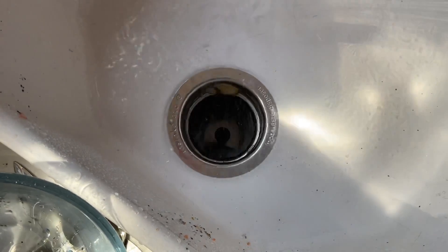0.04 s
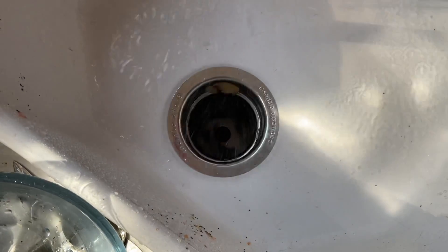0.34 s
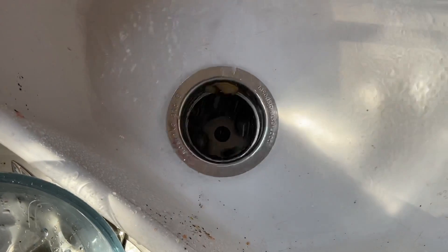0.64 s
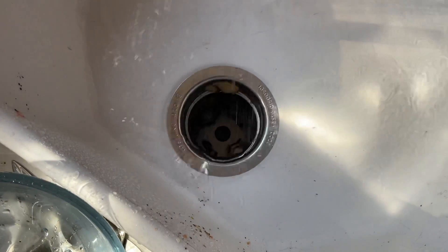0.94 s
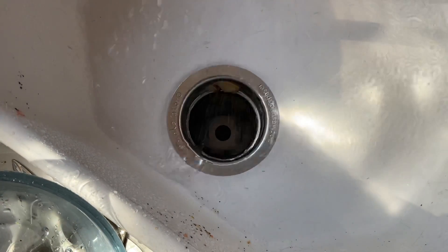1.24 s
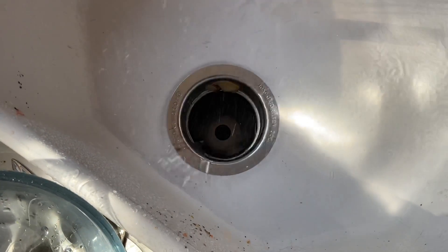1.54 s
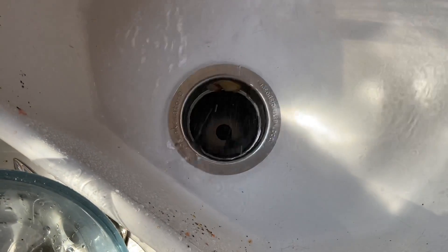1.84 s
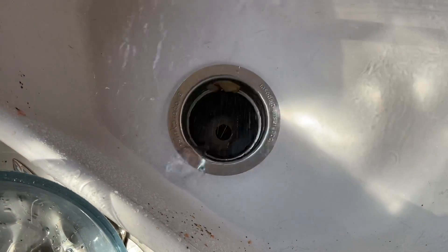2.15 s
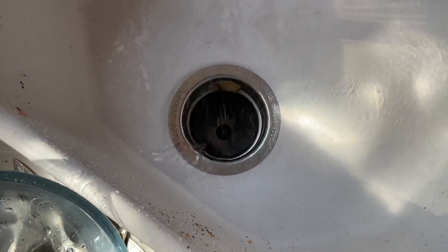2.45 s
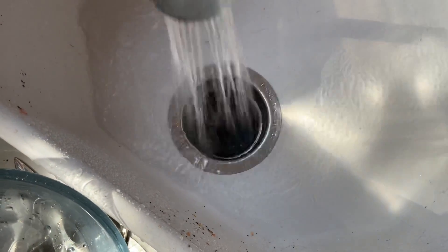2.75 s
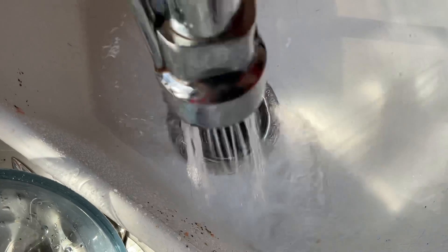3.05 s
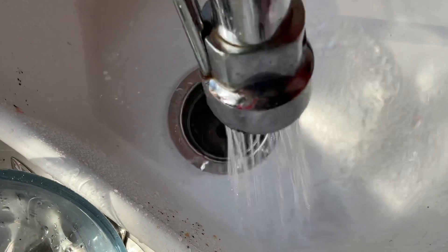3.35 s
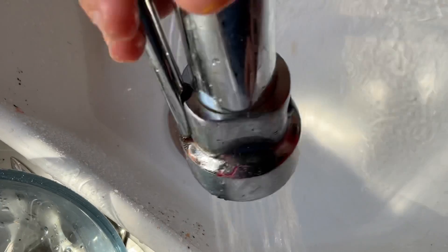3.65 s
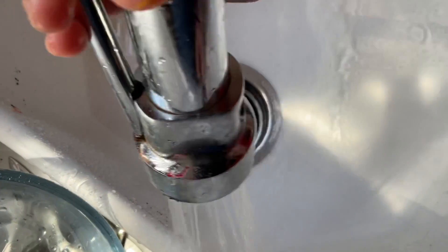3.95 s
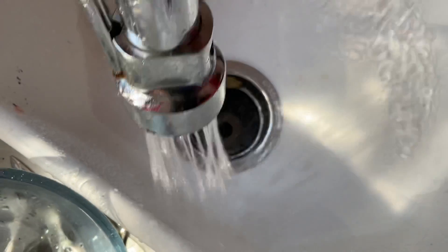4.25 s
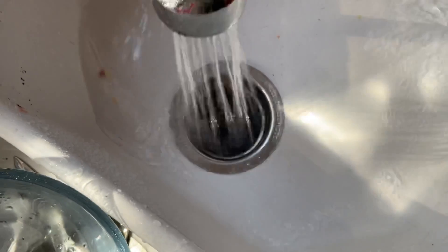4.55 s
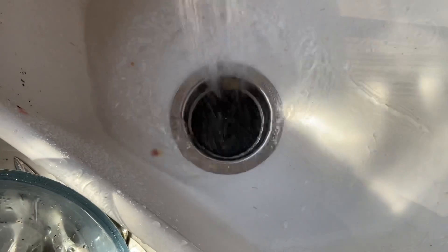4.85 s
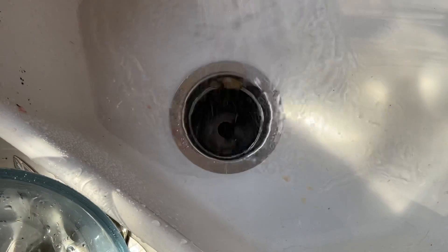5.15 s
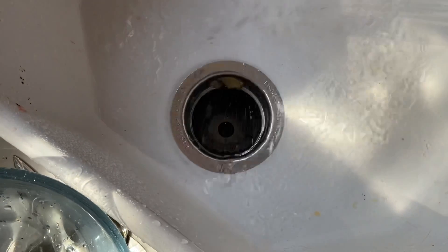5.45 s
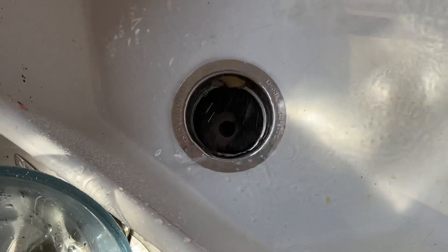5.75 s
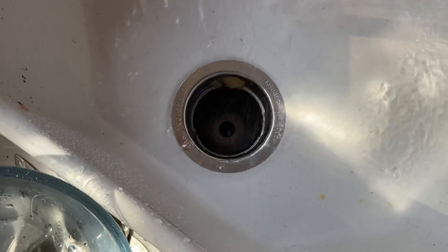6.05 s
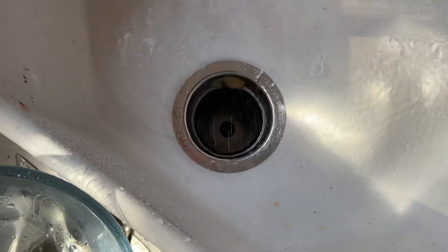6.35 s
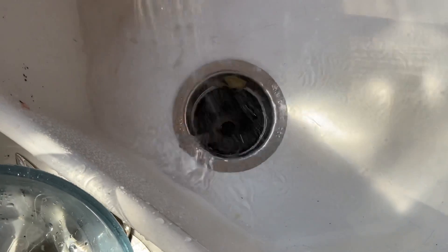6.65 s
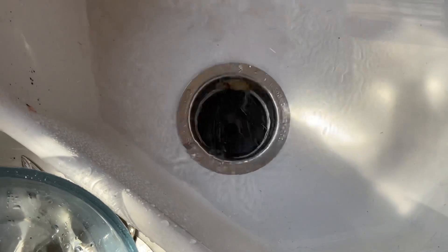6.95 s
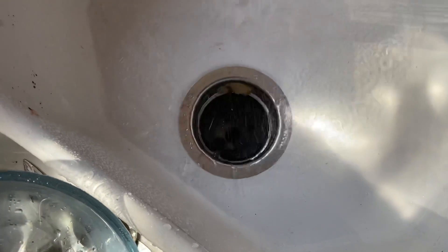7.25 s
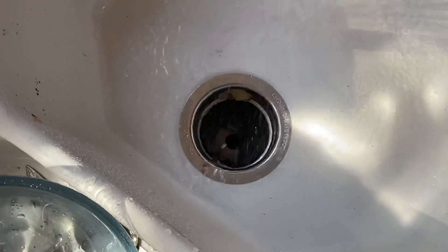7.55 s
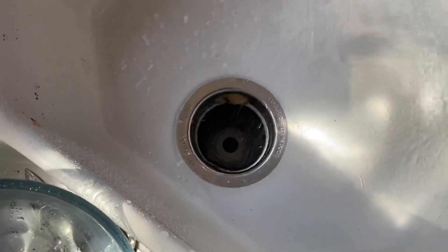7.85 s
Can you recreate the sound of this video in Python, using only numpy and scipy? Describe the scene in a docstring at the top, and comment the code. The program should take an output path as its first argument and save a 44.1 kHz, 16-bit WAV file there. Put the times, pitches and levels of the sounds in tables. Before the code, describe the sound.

Close over a kitchen sink, a waste disposal unit slows, then restarts with a brief scrape and a thud. It keeps humming and churning under the steady hiss of a spray tap, with spitting drops and hollow gurgles from the drain. The churning eases midway as the spray moves over the opening, then returns, growing heavier and louder toward the end as the water is ground away.

```python
"""A waste disposal unit churns and grinds under a kitchen sink while a spray tap runs into the basin.
Its motor coasts down, is switched on again with a jolt and hums; the spinning plate throws water against
the ringing chamber and flings drops at the metal collar. Air glugs and rings in the drain opening, whose
note drops as the spray is swept over it. Then the pooled water goes down and is ground loudly."""
import sys
import numpy as np
from scipy import signal
from scipy.fft import rfft, irfft
from scipy.io import wavfile

SR = 44100
rng = np.random.default_rng(int(sys.argv[2]) if len(sys.argv) > 2 else 0)


def transcribe(signal):
    """Save signal, clipped to [-1, 1], as a 16-bit WAV file at the path in sys.argv[1]."""
    frames = np.atleast_2d(signal).T
    limited = np.clip(frames, -1, 1)
    pcm = np.round(limited * 32767).astype(np.int16)
    wavfile.write(sys.argv[1], SR, pcm)


N = 352800
TIME = np.arange(N) / SR
BIN_HZ = np.arange(N // 2 + 1) * SR / N
DIRECT_ONLY = np.array([[1], [0]])   # water sounds travel as a pair: direct, scattered
FULL_TURNS_PER_S = 24.47
SCRAPE_S, SWITCH_ON_S, JOLT_S = 1.182, 1.203, 1.228


def from_db(db):
    """Decibels to gain."""
    return np.exp(np.asarray(db) * (np.log(10) / 20))


def unit_rms(x):
    """Scale to unit power."""
    return x / np.sqrt(np.mean(x ** 2) + 1e-20)


def automation(rows):
    """One curve over time for each column after the first, which holds seconds."""
    seconds, *columns = np.transpose(rows)
    return [np.interp(TIME, seconds, column) for column in columns]


def on_bins(points):
    """A curve over log frequency, read at every Fourier bin."""
    hz, value = np.transpose(points)
    return np.interp(np.log1p(BIN_HZ), np.log1p(hz), value)


def coloured(x, eq):
    """Shape x with a smooth EQ curve; unit power."""
    return unit_rms(irfft(rfft(x) * from_db(on_bins(eq)), N))


def drift(per_s):
    """A random wander of unit power that changes course about per_s times a second."""
    knots = rng.standard_normal(1000)
    return unit_rms(np.interp(TIME * per_s, np.arange(len(knots)), knots))


def swell(peak_s, rise_s, fall_s):
    """A rounded rise to 1 and fall back."""
    t = TIME - peak_s
    return np.exp(-np.minimum((t / np.where(t < 0, rise_s, fall_s)) ** 2 / 2, 20))


def strikes(events):
    """One click for each event, at its time and level."""
    clicks = np.zeros(N)
    for start_s, db in events:
        clicks[round(start_s * SR)] += from_db(db)
    return clicks


def fading(clicks, decay_s):
    """An envelope that jumps at each click and dies away."""
    return signal.lfilter([1], [1, -np.exp(-1 / (decay_s * SR))], clicks + 1e-18)


def resonate(x, hz, width_hz):
    """A steep-sided resonance whose pitch may glide; unit power."""
    carrier = np.exp(2j * np.pi * np.cumsum(np.broadcast_to(hz, N)) / SR)
    pole = np.exp(-np.pi * width_hz / SR)
    envelope = signal.lfilter([(1 - pole) ** 2], [1, -2 * pole, pole ** 2], x / carrier + 1e-18)
    return unit_rms(np.real(carrier * envelope))


def ring(x, modes):
    """Drive a bank of steep-sided modes, which add in power; unit power."""
    power = sum(from_db(db) ** 2 / (1 + (2 * (BIN_HZ - hz) / width) ** 2) ** 2 for hz, width, db in modes)
    return unit_rms(irfft(rfft(x) * np.sqrt(power), N))


def splashes(per_s, spread_db, wash_db):
    """Random impacts over a smooth wash, direct and scattered; spread_db makes the rare ones bigger."""
    chance = rng.random((2, N)) * (SR / per_s)
    lands, impacts = chance < 1, np.zeros((2, N))
    sizes = from_db(spread_db * np.minimum(-np.log(chance[lands]), 4))
    impacts[lands] = sizes * np.sign(rng.random((2, N))[lands] - .5)
    return unit_rms(unit_rms(impacts) + from_db(wash_db) * rng.standard_normal((2, N)))


def churned(water, turns, beat, scrape_db, surge_db, surges_per_s):
    """Two unequal lugs beat the water each turn, and the plate scrapes past the same spots."""
    spots = rng.standard_normal((2, 1800))
    scraping = from_db(scrape_db) * spots[:, (turns % 1 * spots.shape[1]).astype(int)]
    lugs = sum(share * np.cos(2 * np.pi * (order * turns + rng.random()))
               for order, share in ((1, .8), (2, 1), (3, .6), (4, .6), (9, .6)))
    return (water + scraping) * np.exp(beat * lugs) * from_db(surge_db * drift(surges_per_s))


# The microphone's stereo width. Each row: frequency in Hz, correlation of left and right.
STEREO_LIKENESS = [(100, .999), (150, .995), (300, .96), (600, .9), (1100, .88), (1800, .68), (2200, .93),
                   (2650, .99), (3400, .87), (4600, .99), (5600, .85), (7200, .76), (7900, .995),
                   (11000, .98), (16000, .85)]
# Phase between its two sides. Each row: frequency in Hz, lead of the left side in radians.
STEREO_LEAD = [(0, 0), (150, 0), (300, -.2), (860, .7), (1290, .5), (1550, -1.2), (1810, -1.4),
               (2200, -2.3), (2650, -3.14), (3000, -3.8), (3500, -5.2), (4300, -6.2), (5100, -6.28),
               (6100, -6.1), (7300, -5.2), (7750, -6.28), (12000, -6.3), (16000, -6.5)]
# Balance between its two sides. Each row: frequency in Hz, left over right in dB.
STEREO_BALANCE = [(100, 0), (200, -.5), (380, -3.5), (700, 8), (1290, 4), (2380, 1), (4400, -.4), (8000, 0),
                  (15000, 0)]
def stereo_image(pair):
    """The microphone's two sides pick up the water with frequency-dependent phase, level and likeness."""
    direct, scattered = rfft(pair)
    alike, sides = on_bins(STEREO_LIKENESS), np.array([[1], [-1]])
    both = np.sqrt((1 + alike) / 2) * direct + sides * np.sqrt((1 - alike) / 2) * scattered
    phase = np.exp(sides * .5j * on_bins(STEREO_LEAD))
    balance = from_db(sides * on_bins(STEREO_BALANCE) / 2)
    return irfft(both * phase * balance, N)


# Early reflections off the basin walls. Each row: delay in seconds, level in dB.
WALL_ECHOES = [(.0017, -20), (.0029, -26), (.0047, -13.5), (.0083, -16), (0.0132, -20.5)]
def basin(x, ripple=0.025, ripples_per_s=2.5):
    """Close echoes comb the hiss and make it hollow; the rippling water keeps shifting their paths."""
    out = x
    for delay_s, db in WALL_ECHOES:
        lag = delay_s * SR * (1 + ripple * drift(ripples_per_s))
        heard = np.round(np.arange(N) - lag).astype(int)
        out = out + from_db(db) * x[:, np.clip(heard, 0, N - 1)]
    return out


# The tap's fader, dipping as the spray is swept across the basin. Each row: time in seconds, level in dB.
TAP_LEVEL = [(0, -29.5), (.55, -31.5), (1.16, -31.5), (1.33, -27.5), (2.4, -27.5), (2.8, -31), (3.3, -28.5),
             (4.12, -34), (4.7, -30.5), (5.4, -28), (6.6, -27), (7.15, -25), (8, -28)]
# The bright hiss of water on the basin. Each row: frequency in Hz, relative level in dB.
TAP_EQ = [(40, -7), (80, 1), (170, -7), (330, -19), (520, -29), (650, -16), (830, -14), (1100, -14),
          (1300, -16), (1560, -14), (2500, -17), (4000, -9), (5300, -6.5), (6200, 0), (7500, -3),
          (10000, 2.5), (13000, 0), (16000, -1)]
def tap(splats_per_s=70, splat_s=0.0033):
    """Fine jets patter on the wet basin; now and then a fatter drop bursts into mist."""
    lands = rng.random(N) < splats_per_s / SR
    splats = lands * from_db(1.7 * np.clip(rng.standard_normal(N), -2, 2))
    patter = splashes(per_s=6800, spread_db=3.2, wash_db=3.5)
    patter *= from_db(0.64 * drift(12) + 0.56 * drift(45))
    patter *= np.hypot(1, fading(splats, splat_s))
    return from_db(automation(TAP_LEVEL)[0]) * basin(coloured(patter, TAP_EQ))


def spray_head_notch(x, hz=765, half_width_hz=75, depth_db=-14, centre_s=4.28, half_s=0.11):
    """The spray head passing over the drain hollows out the band between the opening's two air modes."""
    band = irfft(rfft(x) / (1 + ((BIN_HZ - hz) / half_width_hz) ** 6), N)
    return x - band * (1 - from_db(depth_db * swell(centre_s, half_s, half_s)))


# Glugs, high in the drain opening and low in the chamber.
# Each row: centre in seconds, half length in seconds, pitch in Hz, level in dB.
GLUGS = [(0.024, .02, 667, -28), (0.093, 0.048, 331, -31), (0.2, 0.02, 312, -32), (0.312, .016, 252.6, -28),
         (0.335, 0.042, 574, -39), (0.394, .015, 308, -29), (0.476, 0.041, 321, -40),
         (.6, .046, 301, -45.5), (.78, .022, 244.6, -48), (.853, 0.091, 422, -47), (.92, 0.02, 250, -48),
         (1.144, 0.0079, 334, -41), (1.385, .04, 653, -36), (2.255, .016, 645, -36),
         (2.368, 0.013, 655, -33.5), (2.474, 0.038, 436.7, -34.5), (2.688, 0.038, 440, -35),
         (2.795, .03, 285, -30.5), (2.8, 0.035, 449, -30), (2.896, 0.018, 263, -28),
         (2.944, 0.015, 281, -33), (3.05, 0.018, 441, -36), (3.725, .03, 301, -29), (3.763, .014, 880, -35),
         (3.866, .02, 294, -30), (3.94, 0.017, 668, -37), (4.06, .012, 886, -37), (4.135, 0.027, 660, -35),
         (4.575, .015, 468, -35), (4.59, 0.012, 302.6, -25), (4.632, 0.012, 304, -26),
         (4.655, .014, 440, -33), (4.71, .014, 433.4, -32), (4.742, 0.018, 322.3, -30),
         (4.886, .016, 297, -29), (5.008, 0.0099, 344, -29), (5.055, .016, 656, -37),
         (5.13, 0.013, 270.4, -29), (5.15, .02, 663, -33.5), (5.262, .015, 648, -29),
         (5.53, .016, 227.5, -30), (5.612, .016, 259.5, -28), (5.83, .016, 650, -32),
         (5.9, 0.018, 666, -32), (6.023, .014, 663, -35), (6.063, 0.039, 331, -29),
         (6.23, 0.017, 661, -28.5), (6.397, .018, 674, -29), (6.681, 0.014, 273, -29),
         (7.03, .025, 1170, -30), (7.15, .035, 440, -30.5), (7.06, .02, 245, -26), (7.17, .025, 240.3, -26),
         (7.27, .02, 250, -24), (7.33, .016, 265, -26), (7.392, 0.014, 291, -24), (7.458, .02, 250, -26)]
def gurgle(wobble=0.01306, flutter_db=1.5, roughness=0.56):
    """Each pocket of trapped air holds its own note, roughened by the water around it."""
    clock = np.cumsum(1 + wobble * drift(70)) / SR
    notes = sum(from_db(db) * swell(centre_s, half_s, half_s) * np.sin(2 * np.pi * hz * clock)
                for centre_s, half_s, hz, db in GLUGS)
    flutter = from_db(flutter_db * drift(60)) * (1 + roughness * drift(110))
    return np.sqrt(2) * notes * unit_rms(flutter) * DIRECT_ONLY


# The opening's note, lower as the jets close in on it. Each row: time in seconds, pitch in Hz.
DRAIN_NOTE = [(0, 704), (.3, 608), (1.6, 672), (2.4, 650.1), (4.12, 675.5), (4.3, 606), (4.52, 550),
              (4.85, 550), (5.0, 657.3), (8, 673)]
# The drain sucks air and its note sustains. Each row: start in seconds, end in seconds, level in dB.
SUCKING = [(0, .17, -33.5), (1.327, 1.503, -40), (5.034, 5.3, -36.5), (5.809, 5.952, -37),
           (6.19, 6.52, -38)]
def drain_opening(turns, speed_db, inflow_db, half_covered_db=3.5, suck_fade_s=0.012):
    """Churning, jets and sucked air sound the opening's air modes; under heavy inflow it booms lower."""
    note_hz, = automation(DRAIN_NOTE)
    overtone_hz = np.minimum(1.6 * note_hz, 909)   # tops out with the opening clear
    gulps = splashes(per_s=280, spread_db=5.5, wash_db=-2.5)
    gulps = churned(gulps, turns, beat=0.095, scrape_db=-7, surge_db=-0.5, surges_per_s=22)
    churn = from_db(1.5 * speed_db)
    covered = 1 / (1 + from_db(half_covered_db - inflow_db - speed_db) ** 4)
    jets = from_db(-37.5) * swell(4.25, rise_s=0.41, fall_s=0.24)   # the spray blows across the rim
    sucking = sum(from_db(db) * np.clip(np.minimum(TIME - start, end - TIME) / suck_fade_s, 0, 1)
                  for start, end, db in SUCKING)
    note_level = np.hypot(np.hypot(from_db(-44) * churn * (1 - covered), jets), sucking)
    note = note_level * resonate(gulps, note_hz, width_hz=72)
    overtone = np.hypot(from_db(-45) * churn ** 2, jets) * resonate(gulps, overtone_hz, width_hz=167)
    boom = from_db(-32.5) * churn * covered * resonate(gulps, hz=441, width_hz=47)
    return note + overtone + boom


def bubbles(per_s=260, low_hz=1800, high_hz=9000, decay_cycles=11.3, rise=0.044, range_db=18):
    """Small bubbles ping and rise in pitch as they near the surface; unit power."""
    t = TIME[:SR // 50]
    out = np.zeros(N + len(t))
    for when, pitch, softness in rng.random((int(per_s * N / SR), 3)):
        hz, start = low_hz * (high_hz / low_hz) ** pitch, int(when * N)
        age = hz * t / decay_cycles
        chirp = np.sin(2 * np.pi * hz * t * (1 + rise * np.minimum(age, 5)))
        out[start:start + len(t)] += from_db(-range_db * softness) * np.exp(-age) * chirp
    return unit_rms(out[:N])


# Spits of water on the drain collar. Each row: start in seconds, level in dB.
SPITS = [(0.2952, -14.5), (0.3054, -21), (1.2104, -15), (1.2203, -12), (1.3394, -21), (1.8294, -23),
         (3.9379, -27), (4.3276, -18), (4.8763, -19), (4.9492, -14), (4.9995, -33), (6.785, -13.5)]
# Streams hissing on the collar. Each row: centre in seconds, half length in seconds, level in dB.
STREAMS = [(1.425, .08, -29), (3.084, .08, -29.5), (4.943, 0.029, -43), (6.768, .03, -28)]
def spatter(spray_db, strays_per_s=14, decay_s=0.0022):
    """Water breaks on the collar in spits and streams; stray spits grow stronger when more is flung."""
    lands = rng.random(N) < strays_per_s / SR
    strays = lands * from_db(spray_db + 2 + 5.1 * np.clip(rng.standard_normal(N), -2, 2))
    streams = sum(from_db(db) * swell(centre_s, half_s, half_s) for centre_s, half_s, db in STREAMS)
    envelope = np.hypot(fading(strays + strikes(SPITS), decay_s), streams)
    return envelope * ring(rng.standard_normal((2, N)), [(3970, 870, 5.0), (5700, 3000, -0.5)])


# Hiss of flung drops, also the colour of scrape and rattle.
# Each row: frequency in Hz, relative level in dB.
HISS_EQ = [(40, -30), (80, -21), (170, -20), (500, -3.5), (950, -3), (1850, -2.5), (2700, -25), (4100, -2),
           (6000, -8.5), (8000, 1), (15000, -6.5)]
# The ring of metal collar and basin. Each row: pitch in Hz, width in Hz, relative level in dB.
COLLAR_MODES = [(2190, 240, 6), (2296, 67, 4), (2630, 116, 4.5), (2920, 116, 9), (3160, 184, 10),
                (3384, 650, 3.5), (4030, 820, 2.5), (4540, 250, 0), (5290, 1240, 2.5), (5970, 410, 1.5),
                (6450, 680, -1), (7000, 270, 0.5), (8140, 390, -26.5)]
def flung_spray(turns, speed_db, load_db):
    """Drops thrown off the plate hiss and ring the collar amid a fizz of bubbles."""
    drops = splashes(per_s=3000, spread_db=0, wash_db=2)
    drops = churned(drops, turns, beat=0.051, scrape_db=-9, surge_db=1.15, surges_per_s=40)
    spray_db = -27.5 + 1.89 * speed_db + 0.098 * load_db
    hiss = from_db(-3.5) * coloured(drops, HISS_EQ)
    collar = from_db(-1.5) * ring(drops, COLLAR_MODES)
    fizz = from_db(-5.5) * bubbles() * DIRECT_ONLY
    return basin(from_db(spray_db) * (hiss + collar + fizz) + spatter(spray_db))


# Sharp little accents. Each row: start in seconds, peak level in dB.
TICKS = [(0.2952, -23), (0.3054, -19), (0.408, -14), (1.0335, -10), (1.3784, -16), (2.0318, -17),
         (3.1364, -19), (4.3494, -20)]
def ticks(decay_s=0.0015):
    """Single drops and bits of grit strike with a bright snap."""
    t = TIME[:SR // 10]
    bright_noise = signal.lfilter([1, -2, 1], [1, -.35, .35], rng.standard_normal(len(t)))
    tick = bright_noise * np.exp(-t / decay_s)
    return signal.fftconvolve(strikes(TICKS), tick / np.abs(tick).max())[:N]


# Heavy slugs of water landing. Each row: start in seconds, peak level in dB.
THUMPS = [(0.302, -19), (1.826, -22), (2.748, -27), (3.932, -23), (4.558, -26), (4.59, -24), (4.94, -31),
          (5.004, -18.5), (5.13, -25), (5.523, -19.5), (5.688, -19.5), (6.092, -21), (6.987, -18),
          (7.161, -22), (7.26, -18), (7.383, -19), (7.452, -19)]
# The low body of chamber and basin. Each row: pitch in Hz, width in Hz, relative level in dB.
BODY_MODES = [(89.5, 40, -20), (130, 43, -12), (221, 35, -6), (248.5, 32, 3), (297.4, 75, 0.5),
              (352.7, 36, -1), (427, 49, -7.5), (532, 100, -11.5), (698, 150, -12.5)]
def thumps(low_cut_hz=130):
    """Single slugs of water strike the chamber and set its low modes ringing."""
    t = TIME[:SR // 10]
    thump = sum(from_db(db) * np.exp(-np.pi * width * t) * np.sin(2 * np.pi * hz * t)
                for hz, width, db in BODY_MODES)
    thump = signal.sosfilt(signal.butter(2, low_cut_hz, "high", fs=SR, output="sos"), thump)
    return signal.fftconvolve(strikes(THUMPS), thump / np.abs(thump).max())[:N]


def slosh(turns, speed_db, inflow_db, wake_s=0.037):
    """Churned water booms in the low modes, and each thump leaves a brief sloshing wake."""
    slugs = splashes(per_s=300, spread_db=2.5, wash_db=-2.5)
    slugs = churned(slugs, turns, beat=0.028, scrape_db=-6, surge_db=0.9, surges_per_s=12)
    churn = from_db(-32.5 + 1.62 * speed_db + inflow_db)
    wake = from_db(-15.5) * fading(strikes(THUMPS), wake_s)
    return np.hypot(churn, wake) * ring(slugs, BODY_MODES)


def scrape(first_db=-34, last_db=-31):
    """As the motor catches, the plate scrapes harder and harder up to the jolt."""
    gate = (TIME > SCRAPE_S) & (TIME < JOLT_S)
    level = from_db(np.interp(TIME, [SCRAPE_S, JOLT_S], [first_db, last_db]))
    return gate * level * coloured(rng.standard_normal((2, N)), HISS_EQ)


# The unit bounces on its mount. Each row: centre in seconds, pitch in Hz, level in dB.
REBOUNDS = [(1.245, 411, -24), (1.261, 307, -29), (1.276, 300, -27)]
def jolt(kick_hz=350, kick_s=0.0043, sway_hz=52, sway_s=0.092):
    """Starting torque kicks one low basin mode; the mount shudders and rattles, and the unit sways."""
    rattle = from_db(-12) * coloured(rng.standard_normal(N), HISS_EQ)
    kick_tone = np.sqrt(2) * np.sin(2 * np.pi * kick_hz * TIME)
    kick = from_db(-14) * swell(JOLT_S, kick_s, kick_s) * (kick_tone + rattle)
    mount = ring(rng.standard_normal(N), [(356.3, 86, 0)])
    shudder = from_db(-27) * swell(JOLT_S, rise_s=0.023, fall_s=0.029) * (mount + rattle)
    sway = from_db(-39) * swell(JOLT_S, kick_s, sway_s) * np.sin(2 * np.pi * sway_hz * TIME)
    rebounds = sum(from_db(db) * swell(centre_s, kick_s, kick_s) * np.sin(2 * np.pi * hz * TIME)
                   for centre_s, hz, db in REBOUNDS)
    return kick + np.sqrt(2) * rebounds + shudder + sway


def mains_hum(hz=100, left_lead_rad=0.012):
    """The mains drones at one pitch, swelling as the motor pulls up to speed and as it pumps out."""
    inrush_db = 6 * swell(1.33, rise_s=0.021, fall_s=0.021)
    pumping_db = 4.5 * swell(7.5, rise_s=0.26, fall_s=0.48)
    level = from_db(-41 + inrush_db + pumping_db + 0.6 * drift(4.7))
    return np.sqrt(2) * level * np.sin(2 * np.pi * hz * TIME + np.array([[left_lead_rad], [0]]))


def shaft_turns(speed, wander):
    """Turns made so far by a shaft whose speed wanders slightly."""
    return np.cumsum(FULL_TURNS_PER_S * speed * (1 + wander * drift(8))) / SR


# Shaft tones and slot whine. Each row: cycles per turn (played rounded to a whole number),
# RMS level at full speed in dB, left over right in dB.
MOTOR_TONES = [(2, -60.5, -7.5), (3, -62, -4), (5, -58.5, 0.5), (6, -54.5, -1), (8, -58, 0), (9, -44, -1.5),
               (12, -44.5, -5.5), (13, -45, 2), (14, -47, 1), (17, -53, -4), (18, -54, -11.5),
               (22, -52, -11), (23, -51, 4), (26, -50, 4), (27, -52.5, 13), (29, -57.5, 21),
               (30, -53.5, 12), (33, -54.5, 8), (36, -55.5, 19.5), (39, -58, 3), (42, -50.5, 9),
               (45, -56, -5), (46, -57, 0), (48, -50, -3), (56, -56, 24), (60, -54, 4), (69.6, -54.5, 8),
               (70.55, -55, 2)]
def motor(speed, top_unbalance_order=8, waver_db=3, flutter_db=1.5):
    """Low unbalance tones follow the shaft even as it coasts; hum and slot whine need the power on."""
    turns = shaft_turns(speed, wander=0.00187)
    powered = np.interp(TIME, [SWITCH_ON_S, JOLT_S], [0, 1]) ** 2
    out = powered * mains_hum()
    for order, db, pan_db in MOTOR_TONES:
        level = speed ** 2 * from_db(db)
        if round(order) > top_unbalance_order:
            level *= powered * from_db(waver_db * drift(9) + flutter_db * drift(55))
        tone = np.sqrt(2) * level * np.sin(2 * np.pi * (round(order) * turns + rng.random()))
        out += tone * from_db([[pan_db / 2], [-pan_db / 2]])
    return out


# The grinding chamber's midrange ring. Each row: pitch in Hz, width in Hz, relative level in dB.
CHAMBER_MODES = [(1485, 50, -2), (1542, 70, 5), (1660, 110, -2), (1738, 97, -0.5), (2048, 150, 3.5),
                 (2183, 82, 7), (2370, 290, -2)]
# The wall's strongest ring. Each row: time in seconds, pitch in Hz, level at full speed in dB.
WALL_RING = [(1.3, 1395, -46), (2.02, 1370, -43), (2.12, 1368, -32.5), (2.25, 1374, -43),
             (2.45, 1370, -33.5), (2.66, 1380, -36), (2.77, 1380, -30.5), (3.0, 1385, -33),
             (3.15, 1386, -37), (3.9, 1388, -43.5), (4.2, 1363, -37), (4.42, 1343, -39), (4.53, 1380, -48),
             (4.68, 1370, -35.5), (5.2, 1393, -42.5), (6.45, 1394, -37), (6.6, 1383, -31),
             (7.2, 1370, -31.5), (7.45, 1421, -30), (7.68, 1400, -28.5), (7.85, 1431, -37)]
# The flooded chamber's deeper ring. Each row: pitch in Hz, width in Hz, relative level in dB.
FLOODED_MODES = [(1014, 27, 1), (1102, 62, 1), (1190, 74, 2)]
def grinding(turns, speed_db, load_db):
    """Small slugs grind along the chamber wall, which rings lower while the pooled water floods it."""
    slugs = splashes(per_s=700, spread_db=2, wash_db=3.5)
    slugs = churned(slugs, turns, beat=0.14, scrape_db=-7.5, surge_db=1.5, surges_per_s=35)
    effort = from_db(1.85 * speed_db + load_db)
    grind = from_db(-34.5) * effort * ring(slugs, CHAMBER_MODES)
    wall_hz, wall_db = automation(WALL_RING)
    wall = from_db(wall_db + 1.7 * speed_db) * resonate(slugs, wall_hz, width_hz=140)
    flooding = from_db(-30) * swell(7, rise_s=0.16, fall_s=0.37)
    flood = np.hypot(from_db(-48.5) * effort, flooding) * ring(slugs, FLOODED_MODES)
    return grind + wall + flood


# The motor coasts down and restarts. Each row: time in seconds, share of full speed.
MOTOR_SPEED = [(0, 0.9), (.3, 0.72), (.38, 0.51), (.6, 0.39), (.95, 0.23), (1.19, .23), (1.222, 0.77),
               (1.32, 1)]
# Water in the chamber, relative to a steady trickle.
# Each row: time in seconds, inflow in dB, load on the plate in dB.
WATER_FEED = [(0, 1, 6), (.3, 3.5, 7), (1.4, 1.5, 3.5), (2.35, -2.5, 4.5), (2.7, 0, 6.5), (2.77, 5, 8),
              (2.95, 2.5, 8), (3.15, 0.5, 2), (3.93, -3, 2), (4.02, -3, -3), (4.3, -7.5, -10),
              (4.545, -4, -5), (4.57, 4.5, 4.5), (4.76, 4, 5), (4.82, 1, 1.5), (5.3, -3.5, 1.5),
              (6.05, 0.5, 5.5), (6.35, -3, 0.5), (6.65, 1, 7.5), (6.95, 5.5, 6), (7.44, 7, 9),
              (7.7, 3.5, 6.5), (7.9, 0, 2)]
def scene():
    """The plate's speed and the water fed to it drive the churning; the tap runs throughout."""
    speed, = automation(MOTOR_SPEED)
    speed_db = 20 * np.log10(speed)
    inflow_db, load_db = automation(WATER_FEED)
    turns = shaft_turns(speed, wander=0.002)
    water = tap() + gurgle() + drain_opening(turns, speed_db, inflow_db)
    water += flung_spray(turns, speed_db, load_db) + ticks() + thumps() + scrape()
    water += slosh(turns, speed_db, inflow_db) + grinding(turns, speed_db, load_db)
    return stereo_image(spray_head_notch(water)) + jolt() + motor(speed)


def record(dry, low_cut_hz=42, high_cut_hz=15750):
    """The lowest rumble is rolled off and the top is cut steeply."""
    clean = signal.sosfilt(signal.butter(7, low_cut_hz, "high", fs=SR, output="sos"), dry)
    return signal.sosfilt(signal.ellip(12, .1, 80, high_cut_hz, fs=SR, output="sos"), clean)


dry = scene()
out = record(dry)
transcribe(out)
```